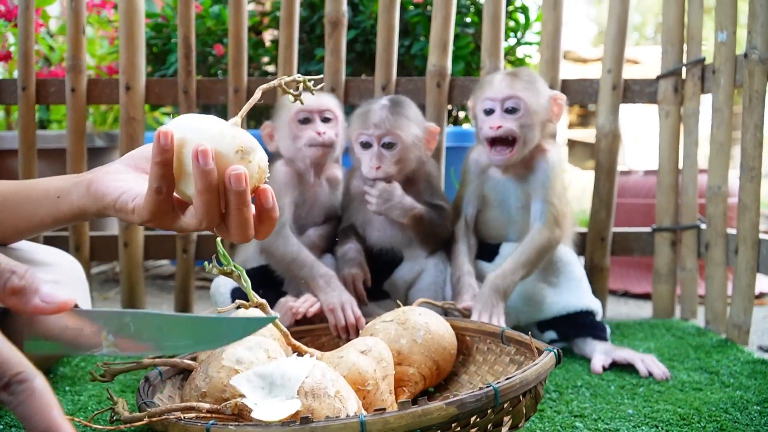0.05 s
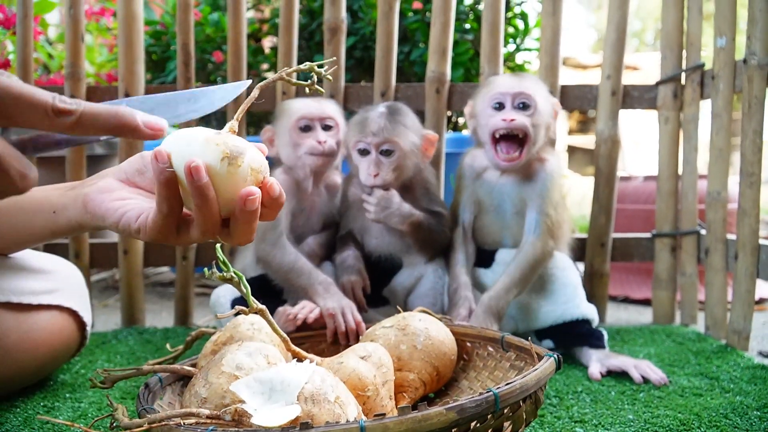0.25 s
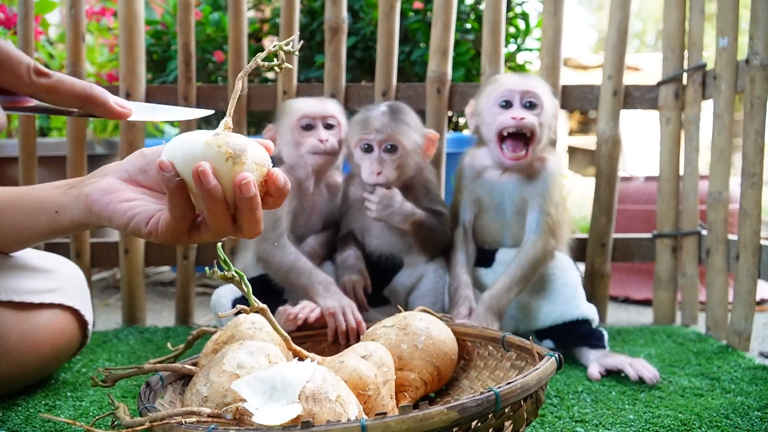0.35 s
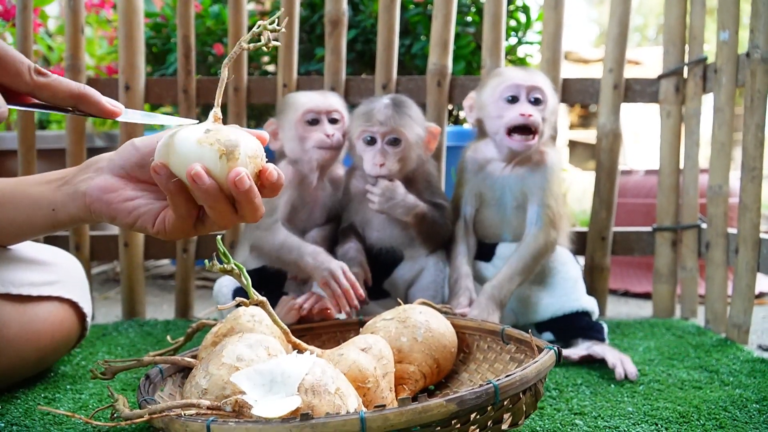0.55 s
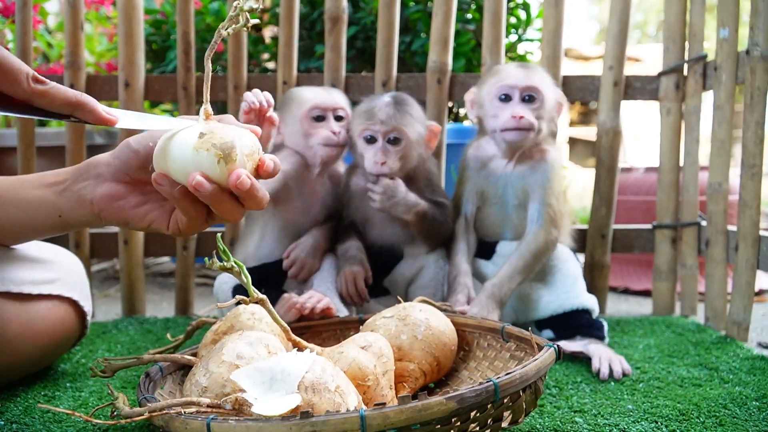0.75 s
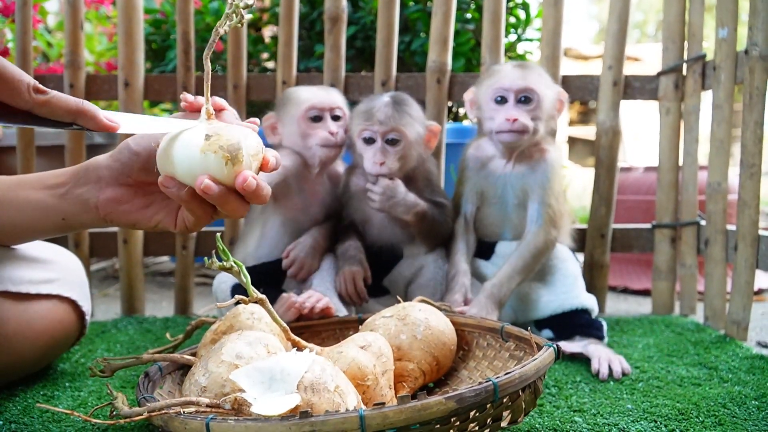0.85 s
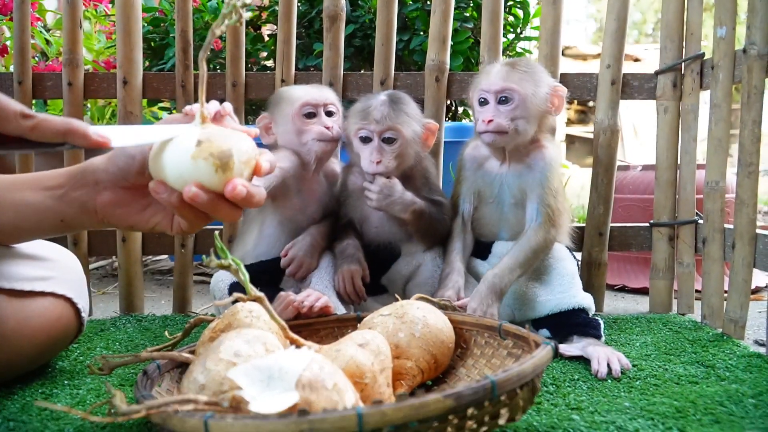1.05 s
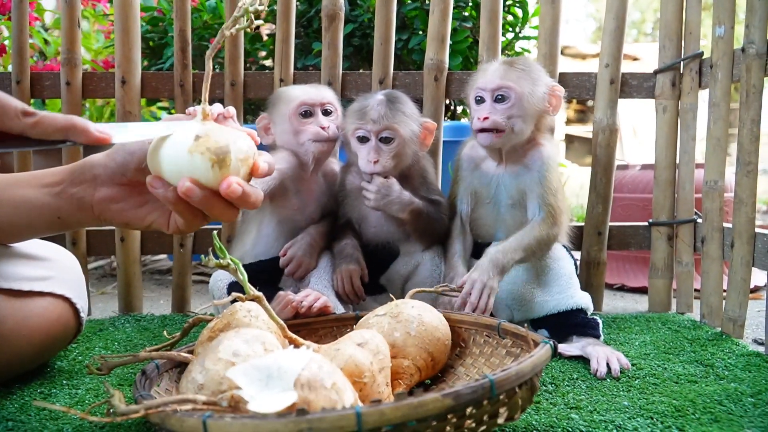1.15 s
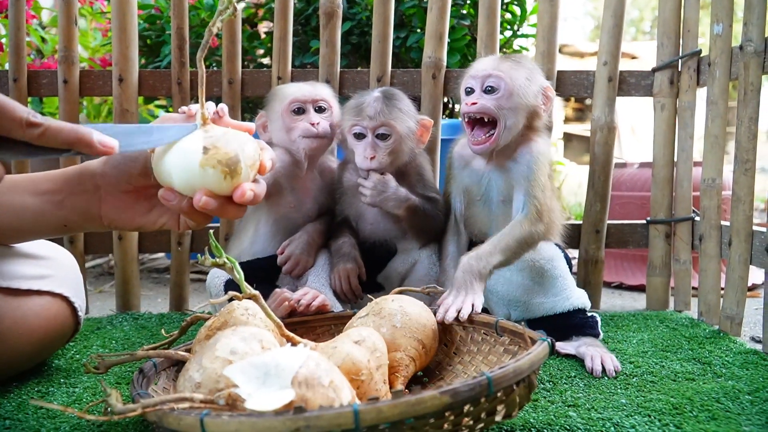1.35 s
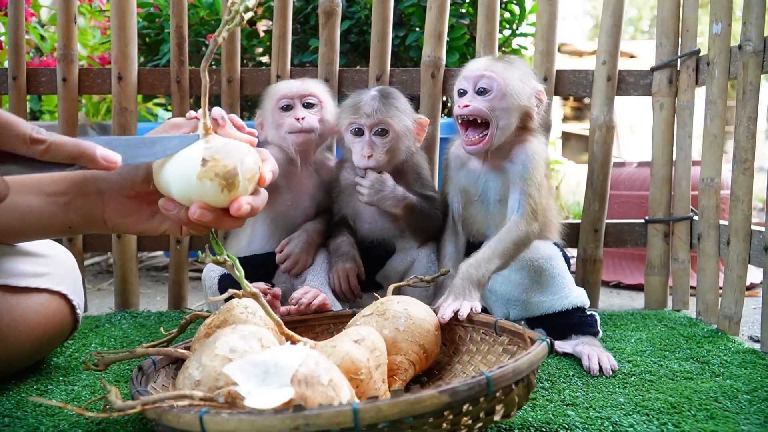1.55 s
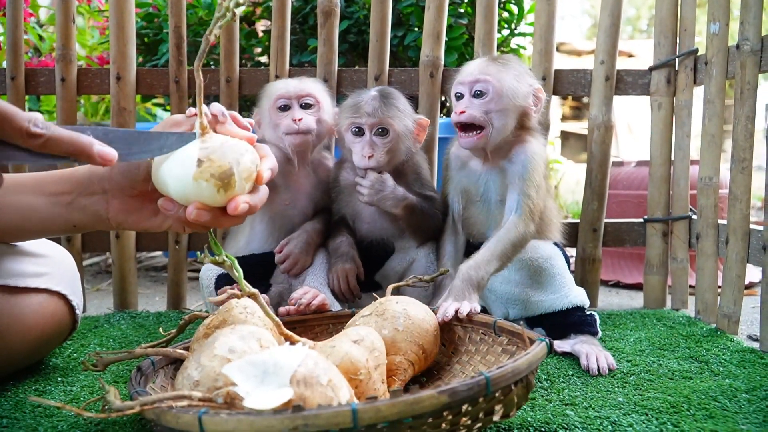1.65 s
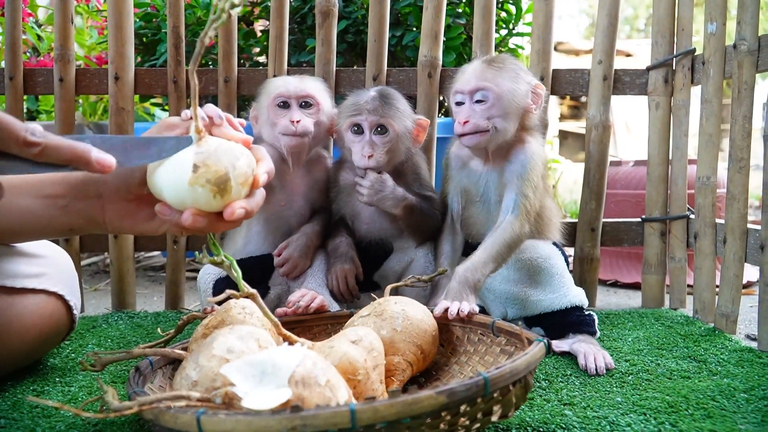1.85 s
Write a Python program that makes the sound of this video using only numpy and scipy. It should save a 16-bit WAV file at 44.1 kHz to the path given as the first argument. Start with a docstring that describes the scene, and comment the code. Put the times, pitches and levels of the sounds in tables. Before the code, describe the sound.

A baby monkey gives two piercing, fluttering squeals outdoors, each diving into a short hoarse rasp.

```python
"""Baby monkey on a lawn by a fence: two squeals, just after the end of an earlier cry.
Squeal: thin whistle arching to 10 kHz with fast pulsed flutters, then a dive, hoarse rasp and tiny grunt.
Whistle: sine plus octave, side tones and hiss. Rasp, grunt, cry: harmonic buzzes through throat filters.
Yard: two decaying-noise reflections of the squeals. Knife, bump and air: filtered noise."""
import sys
import numpy as np
from scipy import signal
from scipy.fft import rfft, irfft, next_fast_len
from scipy.io import wavfile
from scipy.ndimage import uniform_filter1d

SR = 44100
rng = np.random.default_rng(int(sys.argv[2]) if len(sys.argv) > 2 else 0)


def waveform_to_disk(signal):
    """Save audio, clipped to [-1, 1], as 16-bit WAV at the path in sys.argv[1]."""
    frames = np.transpose(np.atleast_2d(signal))
    scaled = np.clip(frames, -1, 1) * 32767
    samples = np.round(scaled).astype(np.int16)
    wavfile.write(sys.argv[1], SR, samples)


N = 83790
T = np.arange(N) / SR  # s

# steady outdoor air: [f/Hz, relative level/dB]
AIR_SHAPE = [(15, -52.5), (25, -11.5), (127, -5.5), (206, -8), (384, -6), (463, -7.5), (775, -19),
             (840, -19), (1070, -14), (1230, -16), (2350, -21), (2690, -18.5), (16000, -43)]
# soft low bump: [f/Hz, relative level/dB]
BUMP_SHAPE = [(25, -8.5), (75, -3), (150, -10), (400, -11.5), (900, -39.5)]
# knife ticks: [t/s, level/dB]
TICKS = [(1.205, -56), (1.266, -48)]
# tick spectrum: [f/Hz, relative level/dB]
TICK_SHAPE = [(400, -18), (1500, 1.5), (4500, -2), (8000, -14), (15000, -26.5)]
# blade sliding under the peel: [t/s, level/dB]
PEEL_LEVEL = [(.86, -70.5), (.93, -62), (1.01, -63), (1.06, -81.5)]
# peel spectrum: [f/Hz, relative level/dB]
PEEL_SHAPE = [(1500, -26.5), (3000, -23), (3700, 1), (5000, -3.5), (6500, -25), (12000, -28.5)]
# fence scatter filter: [f/Hz, gain/dB]
NEAR_SHAPE = [(200, -7), (1000, -1.5), (3000, -2.5), (8000, 1), (10000, -7), (16000, -4)]
# yard tail filter: [f/Hz, gain/dB]
YARD_SHAPE = [(200, -12.5), (1000, -0.5), (3000, 2), (5000, 2), (8000, 0.5), (10000, -6.5), (12000, -18.5),
              (16000, -22.5)]
# earlier cry, throat filter: [f/Hz, relative level/dB]
CRY_SHAPE = [(700, -28), (1350, 0), (2100, 5), (2750, -1), (3450, 1.5), (4100, -1.5), (5000, -16.5),
             (7000, -13), (12000, -25)]
# earlier cry, echo spectrum: [f/Hz, relative level/dB]
CRY_TAIL_SHAPE = [(900, -16.5), (1350, -4), (2200, -1.5), (4200, -3), (5700, -11), (7500, -2),
                  (8300, -13.5), (10000, -21.5), (16000, -37.5)]
# closing grunts: [start t/s, level/dB]
GRUNTS = [(0.573, -32), (1.644, -33.5)]
# grunt throat filter: [f/Hz, relative level/dB]
GRUNT_SHAPE = [(120, -24.5), (240, 3), (450, 4), (700, -36), (1500, -33.5), (4000, -59)]
# noise burst as the whistle tears into the first rasp: [t/s, level/dB]
TEAR_LEVEL = [(.498, -52.5), (.507, -25.5), (.517, -14.5), (.53, -12), (.542, -14.5), (.55, -45)]
# tear spectrum: [f/Hz, relative level/dB]
TEAR_SHAPE = [(1500, -38), (3000, -28), (3700, -7), (4700, -3.5), (5500, -12.5), (7500, -20.5),
              (10300, -22), (16000, -35)]
# hoarse noise patches: [start t/s, end t/s, level/dB]
HUSKS = [(0.243, 0.274, -47), (0.41, 0.457, -42.5), (1.527, 1.602, -41)]
# husk spectrum: [f/Hz, relative level/dB]
HUSK_SHAPE = [(2000, -38), (3200, -13.5), (3800, 0), (4500, -0.5), (5500, -20.5), (9000, -42.5)]
# hoarse endings: [start t/s, end t/s, first f/Hz, last f/Hz, level/dB, roughness 0-1]
RASPS = [(0.525, 0.564, 1856, 1364, -13, .55), (1.616, 1.634, 1848, 1203, -14, .5)]
# rasp throat filter: [f/Hz, relative level/dB]
THROAT_SHAPE = [(200, -44.5), (850, -28), (1250, -18.5), (1700, -6.5), (1950, -2.5), (2200, -21.5),
                (2450, -2), (2800, -3), (3600, 0), (4700, -4), (6000, -21), (8500, -25.5), (10300, -28),
                (11500, -36.5), (16000, -41)]
# whistle pitch, one table per squeal: [t/s, f/Hz]
PITCH = [
    [(.14, 6200), (.165, 7380), (.185, 8200), (.208, 8670), (.243, 8620), (.252, 9710), (.29, 10300),
     (.36, 10270), (.39, 9637), (.41, 9750), (.43, 9130), (.46, 8320), (.49, 7020), (.51, 5920),
     (.525, 4735)],
    [(1.315, 7600), (1.332, 8520), (1.35, 9128), (1.393, 9040), (1.425, 9950), (1.455, 10130),
     (1.478, 9585), (1.5, 9855), (1.53, 8980), (1.55, 8507), (1.58, 7387), (1.608, 5453), (1.622, 3545)],
]
# whistle force, one table per squeal: [t/s, level/dB]
LEVEL = [
    [(.135, -76), (.148, -45.5), (.16, -47.5), (.164, -32), (.203, -20.5), (.243, -25), (.267, -33.5),
     (.298, -9.5), (.325, -9.5), (.341, -24), (.357, -8), (.372, -6), (.397, -15.5), (.429, -13.5),
     (.455, -5.5), (.475, -12.5), (.505, -13.5), (.516, -29), (.524, -48.5)],
    [(1.317, -59), (1.322, -31.5), (1.332, -21), (1.35, -37), (1.394, -25.5), (1.412, -42.5), (1.427, -21),
     (1.434, -10.5), (1.472, -9), (1.494, -22.5), (1.506, -10), (1.518, -8), (1.545, -14.5), (1.582, -6),
     (1.6, -15.5), (1.616, -19), (1.623, -51.5)],
]
# pulsed stretches: [start t/s, end t/s, depth 0-1]
FLUTTERS = [(0.242, 0.298, 0.6), (0.296, .329, .22), (0.332, 0.355, 0.58), (.393, 0.426, 0.8),
            (1.393, 1.43, 0.8), (1.483, 1.506, 0.77)]
# side tones: [multiple of whistle f, multiple of second vibration f]
SIDE_ORDERS = [(1, -1), (1, 1), (1, -2), (2, -1), (1, -3)]
# side tones before the fade below, one per order: [level/dB]
SIDE_DB = [-26, -32, -40, -37, -46.5]
# side tones weaken at lower whistle pitch: [whistle f/Hz, gain/dB]
SIDE_FADE = [(5000, -10), (7500, -5.5), (9500, 2.5)]
# nearby reflections cancel at these pitches, so the dive throbs: [f/Hz, depth/dB]
NOTCHES = [(5550, 14), (6800, 11), (7520, 8), (8120, 14.5), (8780, 8.5)]
# whistle breath hiss: [f/Hz, relative level/dB]
HISS_SHAPE = [(300, -24), (1500, -19), (2800, -19.5), (4000, -10), (6000, -15), (8500, -10), (11000, -12.5),
              (13000, -16.5), (16000, -21)]
# noise puffs in the flutter pulses: [f/Hz, relative level/dB]
FLUTTER_HISS_SHAPE = [(500, -41), (3000, -36.5), (4000, -26), (7200, -23.5), (8600, -4.5), (10000, -1),
                      (10900, -9), (12200, -15), (13000, -26.5), (16000, -32)]

SILENT_DB, AIR_DB = -120, -61
BUMP_START_S, BUMP_DB, BUMP_DECAY_S = .232, -53, .05
TICK_DECAY_S = .0014
NEAR_T60_S, NEAR_DB = .22, -25.5
YARD_T60_S, YARD_DB = .46, -26.5
REFLECTION_RISE_S = .012
CRY_HZ, CRY_DB, CRY_DECAY_S = 688.5, -18.5, .0047
CRY_TAIL_DB, CRY_TAIL_S = -46.5, .085
GRUNT_HZ, GRUNT_HOLD_S, GRUNT_DECAY_S, GRUNT_SAG_HZ_PER_S = 284.7, .0069, .009, 3300
RASP_ATTACK_S, RASP_RELEASE_S, RASP_ROUGHEN_S = .00061, .0041, .011
RASP_JITTER, RASP_JITTER_HZ, RASP_NOISE = .12, 397, .72  # jitter, noise: per unit roughness
RASP_BEAT_HZ, RASP_BEAT_DEPTH = 520.2, .5
RASP_CREST, RASP_SPREAD_RAD = 5.9, .7
SECOND_HZ, SECOND_WAVER = 3930, .004  # second vibration; waver: fraction of f
WAVER, OCTAVE_DB, WHISTLE_HISS_DB, NOTCH_WIDTH_HZ = .0018, -19, -36.5, 100
FLUTTER_HZ, FLUTTER_JITTER, FLUTTER_EDGE_S = 305, .042, .004
FLUTTER_SWING_HZ, FLUTTER_SCATTER_HZ = 750, 330  # at depth 1
FLUTTER_POWER, FLUTTER_ROUGH, FLUTTER_HISS_DB = 2.3, .25, -15
CUTOFF_HZ = 15900


def from_db(db):
    """Decibels to gain."""
    return 10 ** (np.asarray(db) / 20)


def rms_one(x):
    """Scale to unit power."""
    return x / np.sqrt(np.mean(x ** 2) + 1e-20)


def curve(rows, outside=None):
    """Join (t/s, value) rows by straight lines."""
    s, value = np.transpose(rows)
    return np.interp(T, s, value, left=outside, right=outside)


def level_gain(rows):
    """Gain from (t/s, level/dB) rows, near silent outside them."""
    return from_db(curve(rows, SILENT_DB))


def colour(x, shape):
    """Filter by (f/Hz, gain/dB) rows, interpolated over log f."""
    hz, db = np.transpose(shape)
    size = next_fast_len(len(x) + 4096)
    f = np.maximum(np.arange(size // 2 + 1) * SR / size, 1)
    gain = from_db(np.interp(np.log(f), np.log(hz), db))
    return irfft(rfft(x, size) * gain, size)[:len(x)]


def noise(shape):
    """Coloured noise of unit power."""
    return rms_one(colour(rng.standard_normal(N), shape))


def drift(rate_hz):
    """Smooth random wander of unit power: noise through a two-pole lowpass."""
    r = np.exp(-2 * np.pi * rate_hz / SR)
    return rms_one(signal.lfilter([1], [1, -2 * r, r * r], rng.standard_normal(N)))


def phase_of(hz):
    """Running phase of a moving pitch."""
    return 2 * np.pi * np.cumsum(hz) / SR


def envelope(start_s, end_s, attack_s, release_s):
    """Straight rise, hold, exponential fall."""
    rise = np.clip((T - start_s) / attack_s, 0, 1)
    return rise * np.exp(-np.clip((T - end_s) / release_s, 0, 40))


def buzz(hz, count, spread_rad=0):
    """Equal harmonics of a pulsing source, unit power; spread smears each pulse over its cycle."""
    phase = phase_of(hz)
    harmonics = (np.cos(k * phase + spread_rad * k * k) * (k * hz < SR / 2) for k in range(1, count + 1))
    return rms_one(sum(harmonics))


def air():
    """Still outdoor air: steady coloured noise."""
    return from_db(AIR_DB) * noise(AIR_SHAPE)


def bump():
    """Soft low bump: a decaying burst of low noise."""
    shape = envelope(BUMP_START_S, BUMP_START_S + .01, .0092, BUMP_DECAY_S)
    return from_db(BUMP_DB) * noise(BUMP_SHAPE) * shape


def knife():
    """Food handling: small noise ticks and a faint slicing hiss."""
    ticks = sum(from_db(db) * envelope(s, s + .0011, .00029, TICK_DECAY_S) for s, db in TICKS)
    peel = level_gain(PEEL_LEVEL) * noise(PEEL_SHAPE)
    return ticks * noise(TICK_SHAPE) + peel


def reflections(x, t60_s, shape):
    """Dense reflections: convolution with exponentially decaying noise, then colour."""
    decay = from_db(-60 * T / t60_s) * np.clip(T / REFLECTION_RISE_S, 0, 1)
    response = rms_one(rng.standard_normal(N) * decay) / np.sqrt(N)  # unit energy
    return colour(signal.fftconvolve(x, response)[:N], shape)


def yard(x):
    """Quick, bright scatter from the fence and a longer, duller tail."""
    near = from_db(NEAR_DB) * reflections(x, NEAR_T60_S, NEAR_SHAPE)
    return near + from_db(YARD_DB) * reflections(x, YARD_T60_S, YARD_SHAPE)


def earlier_cry():
    """Last few cycles of a buzzy cry, plus decaying noise for its echo."""
    hz = CRY_HZ * (1 + .024 * drift(160))
    voice = rms_one(colour(buzz(hz, count=16), CRY_SHAPE))
    cry = from_db(CRY_DB) * voice * envelope(0, .00055, .00014, CRY_DECAY_S)
    echo = from_db(CRY_TAIL_DB) * noise(CRY_TAIL_SHAPE) * envelope(0, .002, .002, CRY_TAIL_S)
    return cry + echo


def grunt(start_s, db):
    """A few slow, sagging pulses as the throat closes."""
    hz = GRUNT_HZ - GRUNT_SAG_HZ_PER_S * np.clip(T - start_s, 0, .04)
    source = buzz(hz * (1 + .12 * drift(120)), count=8)
    voice = rms_one(colour(source, GRUNT_SHAPE))
    return from_db(db) * voice * envelope(start_s, start_s + GRUNT_HOLD_S, .006, GRUNT_DECAY_S)


def tear():
    """The whistle tears into a brief band of noise."""
    return level_gain(TEAR_LEVEL) * noise(TEAR_SHAPE)


def husks():
    """Hoarse patches: noise banded around the second vibration."""
    gain = sum(from_db(db) * envelope(a, b, .01, .0054) for a, b, db in HUSKS)
    return noise(HUSK_SHAPE) * gain


def rasp(start_s, end_s, first_hz, last_hz, db, rough):
    """Lower, falling vibration that roughens, with beats and hiss, through the throat."""
    rough = rough * np.clip((T - start_s) / RASP_ROUGHEN_S, .3, 1)
    glide_hz = curve([(start_s, first_hz), (end_s, last_hz)])
    hz = glide_hz * (1 + rough * RASP_JITTER * drift(RASP_JITTER_HZ))
    source = buzz(hz, count=10, spread_rad=RASP_SPREAD_RAD)
    source = source + rough * RASP_NOISE * rng.standard_normal(N)
    beat = 1 + RASP_BEAT_DEPTH * np.cos(phase_of(RASP_BEAT_HZ * (1 + .25 * drift(200))))
    voice = rms_one(colour(source * beat, THROAT_SHAPE))
    voice = rms_one(np.tanh(voice / RASP_CREST))  # soft peak limit
    return from_db(db) * voice * envelope(start_s, end_s, RASP_ATTACK_S, RASP_RELEASE_S)


def flutter():
    """Depth, phase and pulse gate of the flutter; the gate holds short-term power at one."""
    depth = sum(d * ((T > a) & (T < b)) for a, b, d in FLUTTERS)
    depth = np.clip(uniform_filter1d(depth, int(FLUTTER_EDGE_S * SR)), 0, 1)
    beat = phase_of(FLUTTER_HZ * (1 + FLUTTER_JITTER * drift(75)))
    pulses = 2 * (.5 + .5 * np.cos(beat)) ** FLUTTER_POWER
    gate = 1 - depth + depth * pulses
    return depth, beat, gate / np.sqrt(uniform_filter1d(gate ** 2, size=290))


def side_tones(hz, phase):
    """Sum and difference tones of the whistle and a second vibration."""
    second = phase_of(SECOND_HZ * (1 + SECOND_WAVER * drift(300)))
    sides = sum(from_db(db) * np.sin(k * phase + m * second) for (k, m), db in zip(SIDE_ORDERS, SIDE_DB))
    fade_db = np.interp(hz, *np.transpose(SIDE_FADE))
    return sides * from_db(fade_db + 1.2 * drift(80))


def whistle(pitch, level):
    """Near-pure arch with side tones; flutter chops it into pulses that each bend the pitch."""
    depth, beat, gate = flutter()
    hz = uniform_filter1d(curve(pitch), size=300) * (1 + WAVER * drift(120))
    bend_hz = FLUTTER_SCATTER_HZ * drift(700) - FLUTTER_SWING_HZ * np.sin(beat)
    phase = phase_of(hz + depth * bend_hz)
    dip_db = sum(db * np.exp(-((hz - centre) / NOTCH_WIDTH_HZ) ** 2) for centre, db in NOTCHES)
    fundamental = from_db(-dip_db) * np.sin(phase)
    octave = from_db(OCTAVE_DB + 3 * drift(82)) * np.sin(2 * phase)
    tone = np.sqrt(2) * (fundamental + octave + side_tones(hz, phase))
    tone = tone * (1 + FLUTTER_ROUGH * depth * drift(220))
    hiss = from_db(WHISTLE_HISS_DB) * noise(HISS_SHAPE)
    puffs = from_db(FLUTTER_HISS_DB) * depth * gate * noise(FLUTTER_HISS_SHAPE)
    return level_gain(level) * (gate * tone + hiss + puffs)


def scene():
    """Monkey, yard, earlier cry, knife, bump and air; one channel."""
    voice = sum(whistle(p, l) for p, l in zip(PITCH, LEVEL))
    voice = voice + sum(rasp(*row) for row in RASPS) + sum(grunt(*row) for row in GRUNTS)
    voice = voice + tear() + husks()
    return (voice + yard(voice) + earlier_cry() + knife() + bump() + air())[None]


def record(dry):
    """Steep elliptic lowpass: 12th order, .2 dB ripple, 80 dB stopband."""
    return signal.sosfilt(signal.ellip(12, .2, 80, CUTOFF_HZ, fs=SR, output="sos"), dry)


dry = scene()
out = record(dry)
waveform_to_disk(out)
```